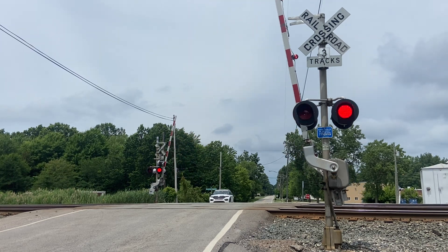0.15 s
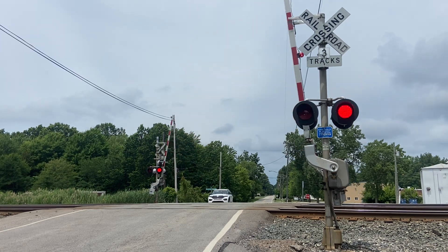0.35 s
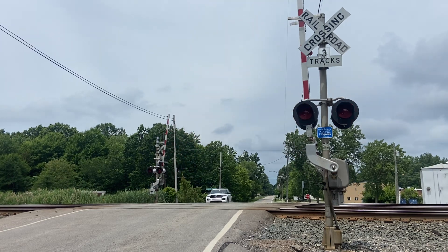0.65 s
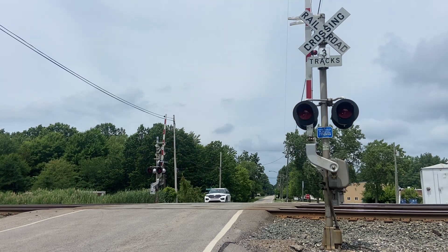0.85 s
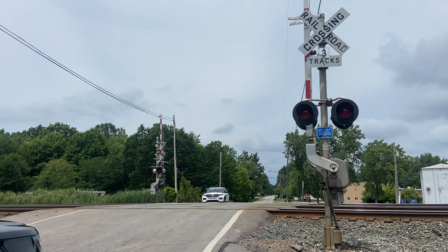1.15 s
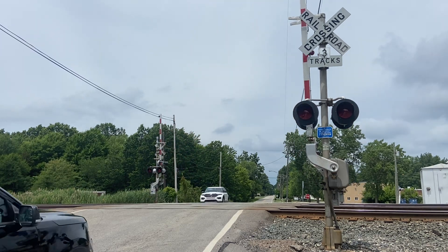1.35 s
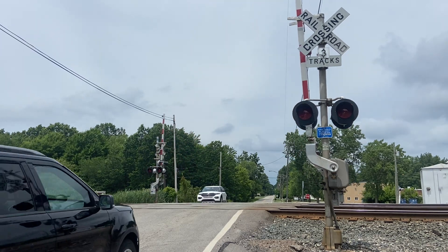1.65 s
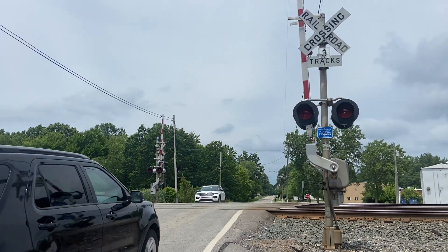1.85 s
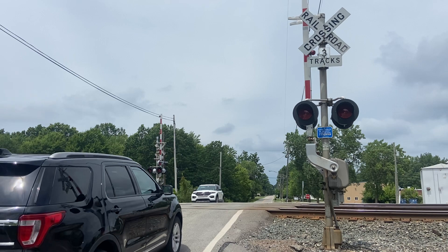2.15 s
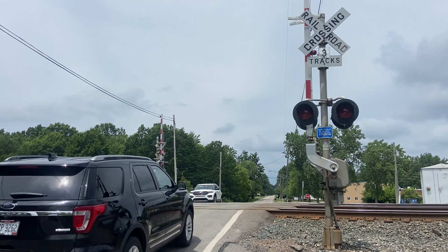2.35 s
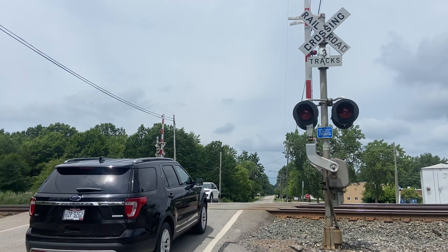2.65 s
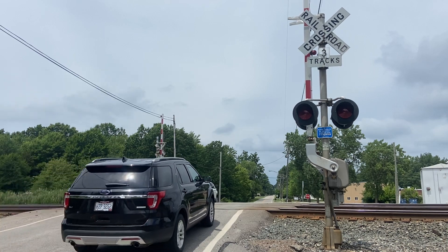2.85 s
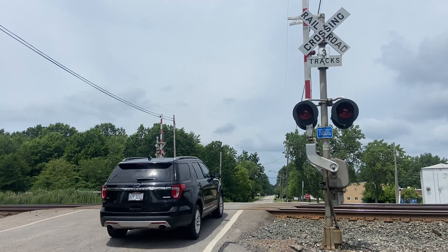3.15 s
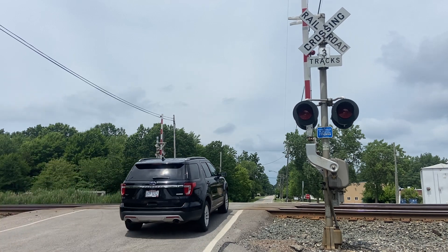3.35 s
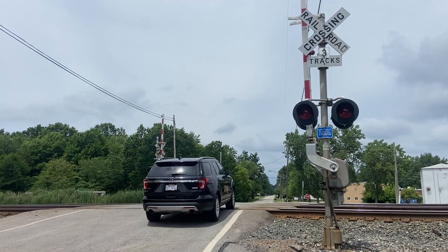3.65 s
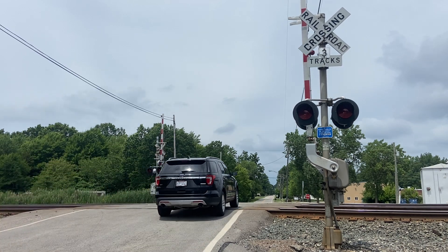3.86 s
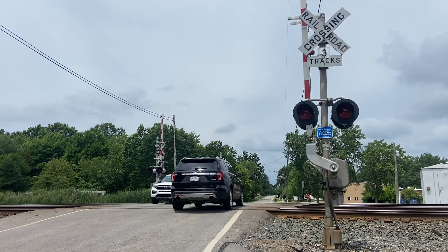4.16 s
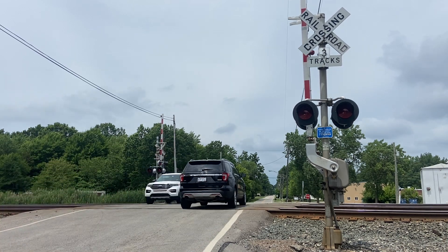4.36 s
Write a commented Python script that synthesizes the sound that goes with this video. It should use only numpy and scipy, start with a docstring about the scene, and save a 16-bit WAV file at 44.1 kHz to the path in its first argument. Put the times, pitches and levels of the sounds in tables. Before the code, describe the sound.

Gate motor hum and a faint squeak give way to a passing SUV's crackling tyres, engine hum, and low thumps on a level crossing.

```python
"""An SUV passes from behind on the left and drives away over a level crossing as the next car draws up.
Its engine throbs as a wavering sine, and later its tailpipe hums and whines at multiples of that rate.
Tyres roar and hiss as coloured noise; sharp bursts make knocks, clacks, grit pops and stones.
A gate's motor hums at first and a brake squeaks briefly; the next car's engine drones throughout.
The crossing adds thumps, a shudder, a rattle and a roar of panels."""
import sys
import numpy as np
from scipy import signal
from scipy.fft import rfft, irfft, next_fast_len
from scipy.io import wavfile
from scipy.ndimage import uniform_filter1d, map_coordinates

SR = 44100
rng = np.random.default_rng(int(sys.argv[2]) if len(sys.argv) > 2 else 0)


def unload_audio(sound):
    """Save the sound as a 16-bit wav file, at the path given as the first command line argument."""
    columns = np.transpose(np.atleast_2d(sound))
    # keep every value between -1 and 1, then stretch to whole-number steps
    steps = np.round(np.clip(columns, -1, 1) * 32767)
    wavfile.write(sys.argv[1], SR, steps.astype(np.int16))


N = 198120

TIME = np.arange(N) / SR
FFT_SIZE = next_fast_len(N, real=True)
FREQ = np.maximum(np.arange(FFT_SIZE // 2 + 1) * SR / FFT_SIZE, 1)
# The sound colour of tyre roar. Each row: frequency in Hz, relative level in dB.
ROAR_COLOUR = [(250, -32), (400, -1), (580, 0), (800, -5), (1100, -8.5), (1600, -39)]
# how much sooner the next car, behind on the left, reaches the left channel
NEXT_LEAD_S = 0.00032
# knocks and clacks have this share of the tyres' lead on the left
KNOCK_LEAD_SHARE = 0.53


def undb(db):
    """Turn decibels into gain."""
    return 10 ** (np.asarray(db) / 20)


def curves(table):
    """Join each column of a table by straight lines in time."""
    seconds, *columns = np.transpose(table)
    return [np.interp(TIME, seconds, column) for column in columns]


def ramp(start, attack):
    """Rise from 0 to 1 and stay there."""
    return np.clip((TIME - start) / attack, 0, 1)


def release(end, decay):
    """Hold at 1, then die away exponentially."""
    return np.exp(-np.maximum(TIME - end, 0) / decay)


def fade(start, db_per_s):
    """Hold at 1, then sink by a steady number of decibels a second."""
    return undb(-db_per_s * np.maximum(TIME - start, 0))


def burst(start, decay, rise):
    """Envelope of one contact: a quick rise and an exponential fall."""
    age = np.clip(TIME - start, 0, 20 * decay)
    return np.minimum(age / rise, 1) * np.exp(-np.maximum(age - rise, 0) / decay)


def turn(hz):
    """Add up a changing frequency into the phase of a tone."""
    return 2 * np.pi * np.cumsum(hz) / SR


def walk(rate):
    """Smoothed random levels with a spread of 1, drawn anew about rate times a second."""
    hold = int(SR / rate)
    held = np.repeat(rng.standard_normal(N // hold + 1), hold)
    smooth = uniform_filter1d(uniform_filter1d(held, hold), hold)[:N]
    return smooth / smooth.std()


def across(points):
    """Join (Hz, value) points by straight lines over log frequency."""
    hz, value = np.transpose(points)
    return np.interp(np.log(FREQ), np.log(hz), value)


def colour(points):
    """Gain of a spectrum that falls steeply past its ends."""
    below = np.minimum(FREQ / points[0][0], 1)
    above = np.minimum(points[-1][0] / FREQ, 1)
    return undb(across(points)) * (below * above) ** 4


def resonance(hz, width_hz):
    """Gain of a steep-sided resonance."""
    return 1 / (1 + ((FREQ ** 2 - hz ** 2) / (FREQ * width_hz)) ** 2)


def noise(gain, grain_db=0, side_db=0):
    """Coloured stereo noise with a mid of rms 1; grain_db breaks it into uneven millisecond grains."""
    # Width of the sound. Each row: frequency in Hz, side level minus mid level in dB.
    stereo_width = [(60, -14), (130, -14), (250, -9), (500, -4), (1200, -5.5), (2300, -2.5), (4400, -1.5),
                    (8000, -4.5)]
    # Lean to the left. Each row: frequency in Hz, left level minus right level in dB.
    left_lean = [(120, 0.3), (250, 0.4), (1000, 1.7), (2000, 0), (4000, 3), (6500, 3.5)]
    size = SR // 1000
    grain_sizes = np.minimum(rng.exponential(size=N // size + 1), 5)
    grains = np.repeat(undb(grain_db * grain_sizes), size)[:N]
    mid, side = rng.standard_normal((2, N)) * grains
    mid = rfft(mid, FFT_SIZE) * gain
    side = rfft(side * undb(side_db), FFT_SIZE) * gain * undb(across(stereo_width))
    lean = undb(across(left_lean) / 2)
    pair = irfft(np.array([(mid + side) * lean, (mid - side) / lean]), FFT_SIZE)[:, :N]
    return pair / pair.mean(axis=0).std()


def from_left(pair, lead):
    """Sound from the left reaches the right channel later by lead seconds."""
    late_right = map_coordinates(pair[1], [(TIME - lead) * SR], order=1, mode="nearest")
    return np.array([pair[0], late_right])


def suv_lead():
    """The SUV's lead at the left channel in seconds, shrinking as it swings ahead."""
    # Each row: time in seconds, lead in seconds.
    tyre_lead = [(0, 0.0003), (.7, .00036), (1.1, 0.00023), (1.5, 0.00018), (2.0, 0.000055),
                 (3.0, 0.000014)]
    return curves(tyre_lead)[0]


def nearness():
    """The SUV's closest distance over its present distance, as it drives past in a straight line."""
    passes_s, speed_m_s, kerb_m = 0.92, 3.1, 2.44
    return kerb_m / np.hypot(kerb_m, speed_m_s * (TIME - passes_s))


def on_crossing():
    """Grow from 0 to 1 as the SUV reaches the rails and the next car draws up."""
    return ramp(start=3.53, attack=0.47)


def engine_throb(phase):
    """Firings throb through the body; throttle swells the throb, then it settles to a cruising level."""
    idle_db, throttle_db, cruise_db = -46.5, -35.5, -39  # combined by power
    throttle = undb(throttle_db) * release(end=1.95, decay=0.41)
    load = np.hypot(throttle, undb(cruise_db)) * ramp(start=0.68, attack=0.4)
    return np.hypot(undb(idle_db), load) * undb(1.8 * walk(22.53)) * np.sin(phase)


def tailpipe(phase, hz):
    """Multiples of the firing rate sound once the pipe faces the listener; a resonance picks out high ones."""
    # Hum at three times the firing rate. Each row: time in seconds, level in dB.
    pipe_hum = [(1.55, -70), (1.73, -44.5), (1.85, -41.5), (2.03, -32.5), (2.5, -33), (2.95, -35),
                (3.3, -40), (3.58, -34), (3.64, -48), (3.7, -38), (4.0, -41), (4.49, -43.5)]
    # Overtones. Each row: multiple of the firing rate, level in dB against the overtones' shared gain.
    overtone_levels = [(2, -1), (4, -14.5), (5, -15), (6, -22), (7, -18), (8, -0.5), (9, -9.5), (14, -17)]
    flutter_db = 1.5
    hum_db, = curves(pipe_hum)
    hum = undb(hum_db + 0.5 * flutter_db * walk(45)) * np.sin(3 * phase)
    overtones = 0
    for multiple, db in overtone_levels:
        tone = np.sin(round(multiple) * phase + rng.uniform(0, 2 * np.pi))
        overtones = overtones + undb(db + flutter_db * walk(45)) * tone
    # high multiples whine thinly as they glide through the pipe's resonance
    pipe_hz, pipe_width_hz, pipe_db = 1024, 25, -10
    whine = 0
    for multiple in (18, 19, 20):
        closeness = 1 / np.hypot(1, 2 * (multiple * hz - pipe_hz) / pipe_width_hz)
        whine = whine + undb(pipe_db + 1.6 * walk(18)) * np.sin(multiple * phase) * closeness
    # they swell as the SUV turns, sink slowly and die when the driver eases off
    turn_s, turn_length_s = 1.586, 0.43
    facing = ramp(turn_s, turn_length_s) * fade(turn_s + turn_length_s, db_per_s=4.5)
    gain = undb(-36.5) * facing * release(end=3.53, decay=0.12)
    return hum + gain * (overtones + whine)


def suv_engine():
    """Uneven firings drive both the body's throb and the tailpipe, with the left channel a little ahead."""
    # Each row: time in seconds, firing rate in Hz.
    engine_speed = [(0, 48.8), (.8, 47.4), (1.5, 51.6), (1.95, 52.97), (2.25, 53.42), (2.8, 54.23),
                    (3.17, 56.1), (3.65, 56.47), (4.49, 55.4)]
    hz, = curves(engine_speed)
    lead = suv_lead()
    uneven_hz = hz * (1 + 0.008 * walk(60))
    # half the lead goes forward on the left and half backward on the right
    phase = turn(uneven_hz) + np.pi * hz * np.array([lead, -lead])
    return np.sqrt(2) * (engine_throb(phase) + tailpipe(phase, hz))


def next_car_drone():
    """The next car's uneven engine drone steadies and swells as it draws up."""
    drone_hz, far_db, crossing_db, octave_db = 103.36, -39, -30, -19
    close = on_crossing()
    opening = 1 - 0.5 * release(end=0, decay=0.087)
    far = undb(far_db) * opening * fade(start=1.25, db_per_s=4.5)
    gain = np.hypot(far, undb(crossing_db) * close)
    rough = 0.5 * (1 - close) + 0.12 * close
    phase = turn(drone_hz * (1 + 0.0483 * rough * walk(6)))
    # random sine and cosine parts roughen both level and phase
    tone = (1 + rough * walk(35)) * np.sin(phase) + rough * walk(35) * np.cos(phase)
    octave = undb(octave_db + 2.5 * walk(25)) * np.sin(2 * phase)
    return np.sqrt(2) * gain * (tone + octave)


def gate_motor():
    """The gate's motor hums roughly, thinner as its load eases and its gears begin to grind."""
    # Each row: time in seconds, base pitch in Hz, level in dB.
    motor_course = [(0, 137.8, -33.5), (.07, 137.2, -34.5), (.1, 140, -48), (.14, 143, -39.5),
                    (.36, 144, -40), (.52, 144, -44), (.62, 143, -47), (.72, 140, -80)]
    # Each row: multiple of the base pitch, relative level in dB at first, then in dB once the load eases.
    motor_partials = [(2, 0, -0.5), (3, -14, -4.5), (4, -11, -3.5)]
    hz, level_db = curves(motor_course)
    phase = turn(hz * (1 + 0.014 * walk(56.5)))
    eased = ramp(start=0.048, attack=0.045)
    hum = 0
    for multiple, first_db, later_db in motor_partials:
        partial_db = first_db + (later_db - first_db) * eased + 3.2 * walk(55.7)
        hum = hum + undb(partial_db) * np.sin(round(multiple) * phase)
    gears = undb(-3) * eased * noise(resonance(hz=403, width_hz=230))
    return undb(level_db) * (np.sqrt(2) * hum + gears)


def tyres(points, near_db, distant_db, next_db, grain_db):
    """One tyre noise from the SUV (level at its nearest), distant traffic and the next car."""
    gain = colour(points)
    near_spread_db, distant_spread_db = -0.5, -3.5
    suv = from_left(noise(gain, grain_db, near_spread_db), suv_lead())
    follower = from_left(noise(gain, grain_db, near_spread_db), NEXT_LEAD_S)
    distant = noise(gain, side_db=distant_spread_db)
    passing = undb(near_db) * nearness() * suv
    return passing + undb(distant_db) * distant + undb(next_db) * on_crossing() * follower


def hiss_swells():
    """The SUV's hiss swells unevenly in three bands."""
    swells = 0
    for hz in (2520, 3790, 4700):
        band = noise(resonance(hz, hz / 4), grain_db=2)
        swells = swells + undb(-58 + 3.5 * walk(32)) * band
    return nearness() * from_left(swells, suv_lead())


def next_car_hiss():
    """The next car's tyres add a hiss of their own colour as it draws up."""
    # Each row: frequency in Hz, relative level in dB.
    next_colour = [(2400, -1), (3600, 6.5), (5400, -8), (7600, 3), (8800, -2), (10500, -27)]
    hiss = noise(colour(next_colour), side_db=0.5)
    return undb(-56) * on_crossing() * from_left(hiss, NEXT_LEAD_S)


def rolling():
    """Tyres on coarse asphalt make a body rumble, a tread roar, crackling grit and a hiss."""
    # Colours of the three other noises. Each row: frequency in Hz, relative level in dB.
    rumble_colour = [(25, -13), (45, -1.5), (75, 6), (130, 3.5), (200, -1.5), (330, -2.5), (450, -6.5),
                     (700, -19)]
    grit_colour = [(800, 3.5), (1300, 5), (1900, 1), (2800, -3.5), (3800, -7), (5500, -22.5)]
    hiss_colour = [(2800, -9), (3500, 1), (4400, 4), (5600, 2.5), (6800, -0.5), (8700, 0), (9400, 1),
                   (10000, 3.5), (11300, -5), (12500, -6), (14200, -14), (15000, -27)]
    rumble = tyres(rumble_colour, near_db=-36.5, distant_db=-39, next_db=-40, grain_db=-1)
    roar = tyres(ROAR_COLOUR, near_db=-39, distant_db=-48.5, next_db=-47, grain_db=1.5)
    grit = tyres(grit_colour, near_db=-43, distant_db=-49, next_db=-50.5, grain_db=1.5)
    hiss = tyres(hiss_colour, near_db=-45.5, distant_db=-86, next_db=-69, grain_db=1.2)
    # each noise wavers in level by itself
    rumble = undb(1.0 * walk(14)) * rumble
    roar = undb(1.33 * walk(30.01)) * roar
    grit = undb(0.56 * walk(29.92)) * grit
    hiss = undb(0.7 * walk(23.59)) * hiss
    return rumble + roar + grit + hiss + hiss_swells() + next_car_hiss()


def grit_pops():
    """Grains crack under the tread at random, each a short decaying tone, heard while the SUV is close."""
    pops_per_s, largest_db, range_db, decay_s = 110, -36, 11, 0.0021
    low_hz, high_hz = 1120, 3750
    out = np.zeros(N)
    age = TIME[:SR // 50]
    for when, pitch, size in rng.random((int(pops_per_s * N / SR), 3)):
        start = int(when * (N - len(age)))
        hz = low_hz * (high_hz / low_hz) ** pitch
        pop = np.exp(-age / decay_s) * np.sin(2 * np.pi * hz * age)
        out[start:start + len(age)] += undb(largest_db - range_db * size) * pop
    return nearness() ** 2 * from_left([out, out], suv_lead())


def brake():
    """The thin squeak of a brake letting go, a high tone that wavers quickly."""
    gain = undb(-48.5) * ramp(start=0.075, attack=0.075) ** 2 * release(end=0.19, decay=0.02)
    return gain * np.sin(turn(5960 * (1 + 0.012 * walk(400))))


def knocks():
    """Each joint or rail slaps the tread, rings the tyre at its own pitch and crunches the grit under it."""
    # Each row: start in seconds, level in dB, rise in seconds, decay in seconds,
    # pitch as a multiple of the tyre resonances, crunch in dB against the knock.
    knock_list = [(.55, -32, .012, .018, .9, -21), (.588, -41, 0.0028, .016, .8, -18),
                  (.609, -35, 0.0029, 0.013, .72, -11), (.716, -33.5, .006, 0.034, 1.25, -10.5),
                  (.787, -32.5, 0.0087, 0.05, .9, -30), (0.84, -35.5, 0.0036, 0.0084, .8, -9),
                  (.893, -31.5, 0.0076, .008, .9, -12), (.929, -37, 0.0023, 0.009, .8, -24),
                  (1.0555, -29, .0016, 0.0065, .9, -10), (1.063, -31.5, .0015, 0.013, .95, -1.5),
                  (1.219, -38, .003, 0.011, 1, -10), (1.329, -34, 0.0043, 0.031, .78, -10),
                  (1.4865, -31.5, .002, 0.015, 1.05, -8), (1.956, -32.5, 0.0081, .017, .9, -9),
                  (1.987, -34.5, .01, 0.013, .8, -16), (2.02, -32.5, .008, 0.02, 1.1, -12.5),
                  (2.056, -32, 0.0041, .012, 1, -13), (2.078, -34, .003, .012, .95, -11),
                  (2.11, -36.5, 0.0096, 0.015, .9, -5.5), (2.143, -38, 0.0022, 0.013, 1, -9),
                  (4.029, -33.5, .003, .005, .5, -11), (4.053, -30, .0017, 0.0052, 1.05, -29),
                  (4.135, -33, .005, .008, 1.1, -10), (4.213, -39, 0.0021, .007, 1, -23),
                  (4.278, -36, .002, 0.0039, .52, -20), (4.401, -33, 0.0014, .006, 1.1, -10),
                  (4.41, -38, 0.0029, 0.0052, .7, -13)]
    # Resonances of the tyre. Each row: frequency in Hz, relative level in dB.
    tyre_modes = [(500, 0), (600, -1), (690, 5), (870, 0.5), (980, -18), (1360, -10)]
    starts, _, rises, _, pitches, _ = np.transpose(knock_list)
    latest = np.maximum(np.searchsorted(starts, TIME) - 1, 0)
    impact = ((starts + rises) * SR).astype(int)[latest]
    # all resonances swing together at the impact, then drift as the tyre flexes
    modes = 0
    for hz, db in tyre_modes:
        phase = turn(hz * pitches[latest] * (1 + 0.038 * walk(250)))
        modes = modes + undb(db) * np.cos(phase - phase[impact])
    ring = modes / modes.std() + undb(-9) * noise(colour(ROAR_COLOUR), side_db=-2)
    crunch = noise(resonance(hz=1600, width_hz=1200), grain_db=0.5, side_db=2.0)
    blows = 0
    for start, db, rise, decay, _, crunch_db in knock_list:
        blows = blows + undb(db) * burst(start, decay, rise) * (ring + undb(crunch_db) * crunch)
    return from_left(blows, KNOCK_LEAD_SHARE * suv_lead())


def clacks():
    """Something loose clacks under the wheels, ringing a few bright modes for an instant."""
    # Each row: start in seconds, level in dB, decay in seconds, pitch as a multiple of the modes.
    clack_list = [(.72, -49, .014, .52), (.887, -34.5, 0.012, 1), (.898, -37, .008, 1),
                  (1.063, -36, 0.0089, .56), (1.484, -38, .006, .72), (3.722, -39, 0.0048, .8),
                  (4.134, -41, .005, .94)]
    # Modes of the loose part. Each row: frequency in Hz, relative level in dB.
    loose_modes = [(1615, 1), (2019, -5), (2400, 6), (2891, -13), (3575, -15), (4021, 2)]
    starts, _, _, pitches = np.transpose(clack_list)
    pitch = pitches[np.maximum(np.searchsorted(starts, TIME) - 1, 0)]
    modes = 0
    for hz, db in loose_modes:
        modes = modes + undb(db) * np.sin(turn(hz * pitch * (1 + 0.0125 * walk(500))))
    envelope = sum(undb(db) * burst(start, decay, rise=0.001) for start, db, decay, _ in clack_list)
    blows = modes / modes.std() * envelope
    return from_left([blows, blows], KNOCK_LEAD_SHARE * suv_lead())


def stones():
    """Small stones snap out from under the tread: a dry crack and a short bright ring."""
    # Each row: start in seconds, level in dB, pitch in Hz, decay in seconds, crack in dB against the ring.
    stone_list = [(0.917, -46, 3820, 0.03, -16), (3.708, -43, 7100, 0.006, -8),
                  (3.72, -43.5, 6760, 0.0055, 6), (4.132, -44.5, 6130, 0.0057, 6.5)]
    # Colour of the crack against the road. Each row: frequency in Hz, relative level in dB.
    crack_colour = [(1000, 3), (1600, 6), (2500, -10), (3620, 4.5), (5000, -2), (8000, -27)]
    out = 0
    for start, db, hz, decay, crack_db in stone_list:
        ring = noise(resonance(hz, width_hz=2600), side_db=-14)
        crack = undb(crack_db) * noise(colour(crack_colour), side_db=-15)
        out = out + undb(db) * burst(start, decay, rise=0.00058) * (ring + crack)
    return out


def rattle():
    """The uneven crossing jolts loose parts in quick, irregular bursts of noise."""
    jolts = undb(-48.5 + 1 * np.minimum(walk(110), 2))
    return on_crossing() * jolts * noise(resonance(hz=730, width_hz=420), grain_db=1.5, side_db=10.5)


def shudder():
    """The body shudders on the uneven crossing as low noise."""
    # Each row: frequency in Hz, relative level in dB.
    body_colour = [(45, -24), (60, -10), (80, -4), (115, -1.5), (160, -1), (230, -9), (320, -21)]
    return undb(-36.5) * on_crossing() * noise(colour(body_colour))


def thumps():
    """The body thumps as wheels drop over the rails, each a short low tone."""
    # Each row: start in seconds, level in dB, pitch in Hz.
    thump_list = [(3.675, -28.5, 172), (3.724, -28, 81), (3.815, -30.5, 185), (4.031, -33, 240),
                  (4.402, -21, 76)]
    out = 0
    for start, db, hz in thump_list:
        tone = np.sin(2 * np.pi * hz * (TIME - start))
        out = out + undb(db) * burst(start, decay=0.017, rise=0.016) * tone
    return from_left([out, out], KNOCK_LEAD_SHARE * suv_lead())


def panels():
    """The tyres roar on the crossing's panels as noise around one resonance."""
    return undb(-38) * ramp(start=4.26, attack=0.079) * noise(resonance(hz=333.3, width_hz=390))


def scene():
    """Add up the engines, tyres, impacts and crossing sounds, in open air."""
    machines = suv_engine() + next_car_drone() + gate_motor() + brake()
    road = rolling() + grit_pops() + knocks() + clacks() + stones()
    crossing = rattle() + shudder() + thumps() + panels()
    return machines + road + crossing


def record(dry):
    """Blend the left channel's high treble into the right with a time shift, and cut the top."""
    blend_from_hz, blend_width_hz, in_phase_hz, shift_s = 5800, 700, 7050, 0.000243
    left, right = rfft(dry, FFT_SIZE)
    shared = np.clip((FREQ - blend_from_hz) / blend_width_hz, 0, 1)
    # the shared treble is earlier on the right, and in step at one frequency
    twist = np.exp(2j * np.pi * (FREQ - in_phase_hz) * shift_s)
    right = np.sqrt(1 - shared) * right + np.sqrt(shared) * twist * left
    pair = irfft(np.array([left, right]), FFT_SIZE)[:, :N]
    top_cut = signal.ellip(8, 0.2, 70, 15200, fs=SR, output="sos")
    return signal.sosfilt(top_cut, pair)


dry = scene()
out = record(dry)
unload_audio(out)
```